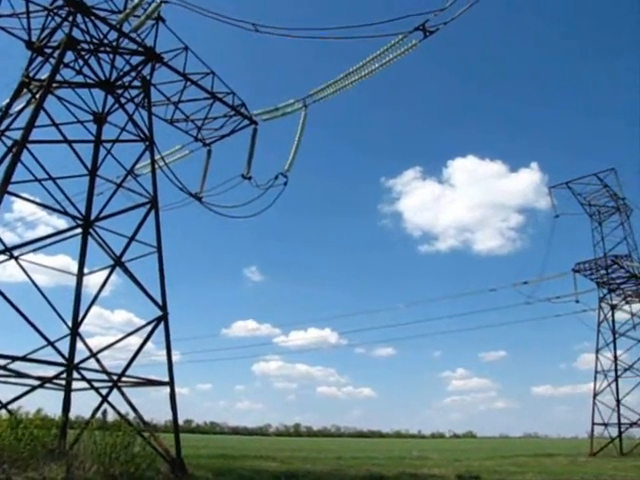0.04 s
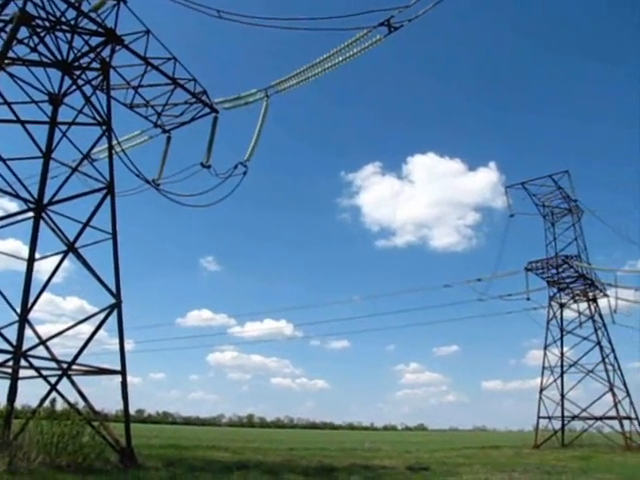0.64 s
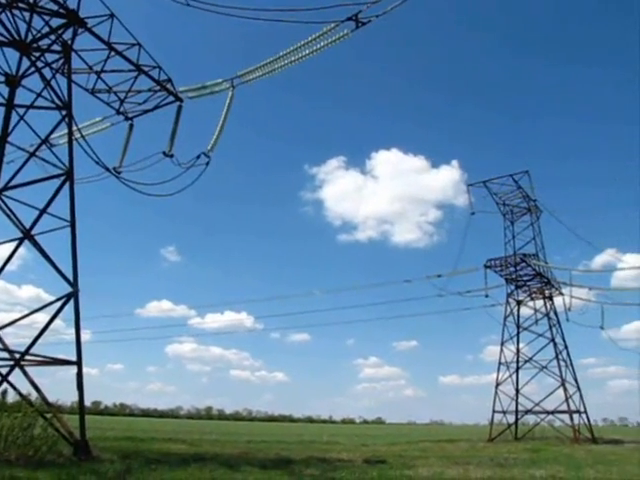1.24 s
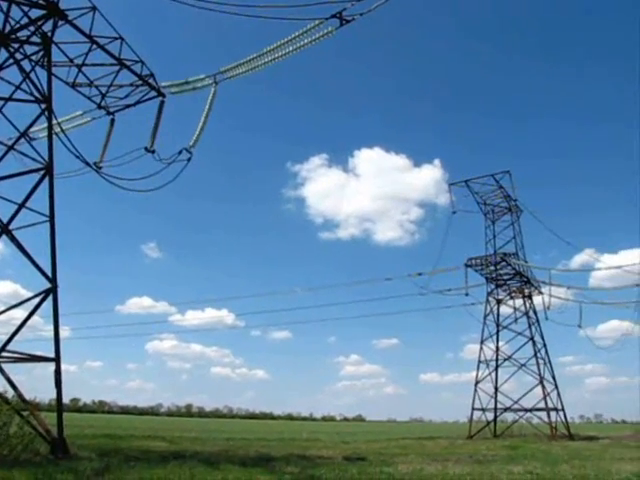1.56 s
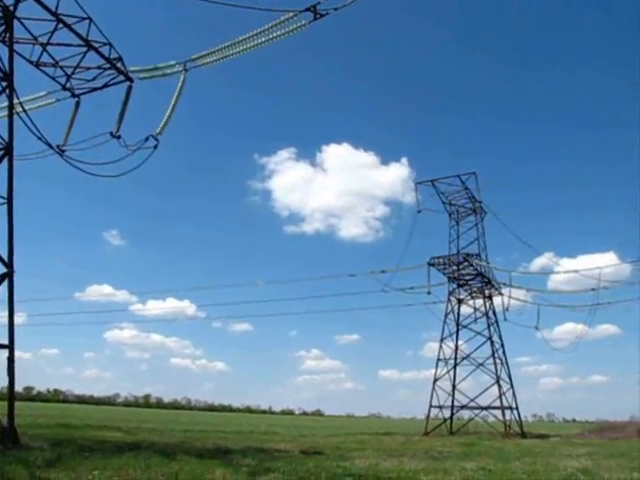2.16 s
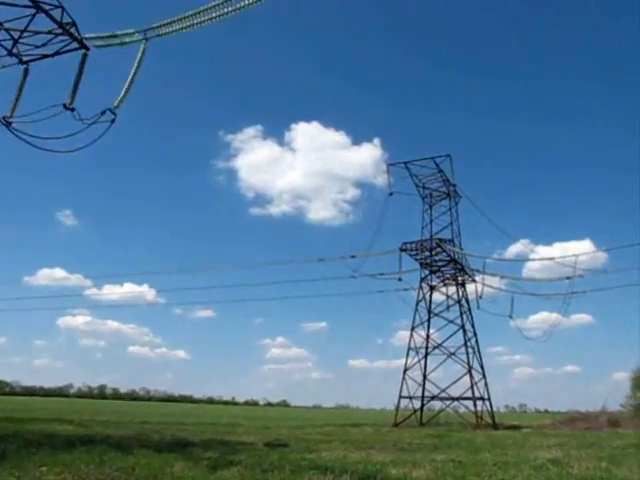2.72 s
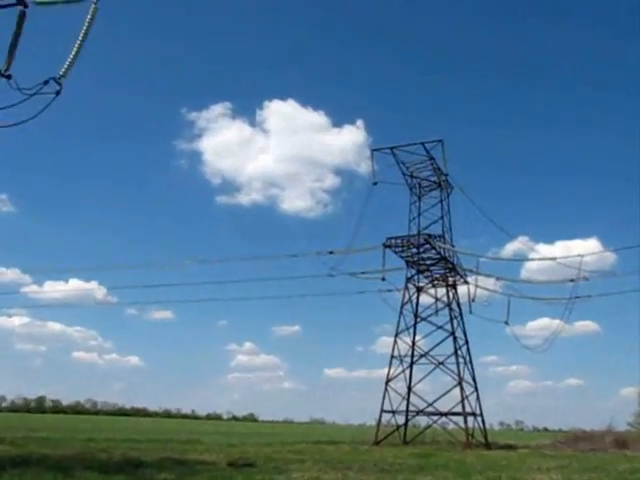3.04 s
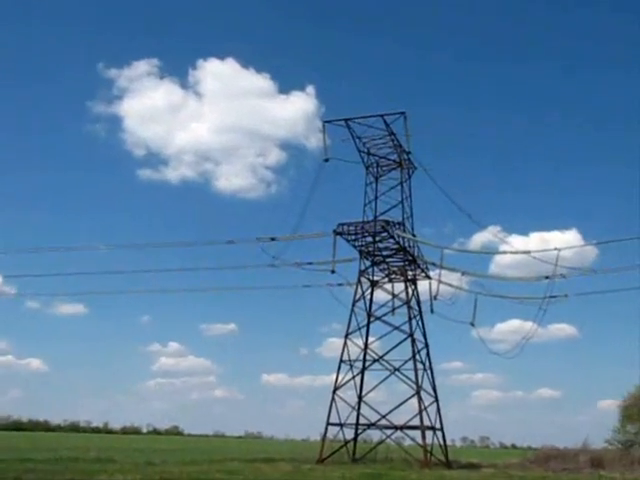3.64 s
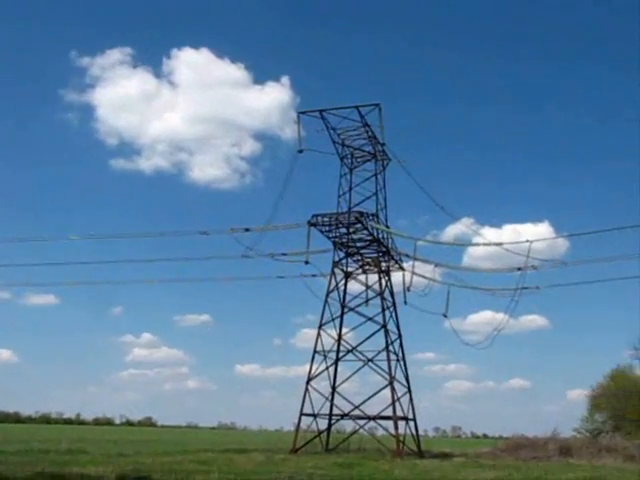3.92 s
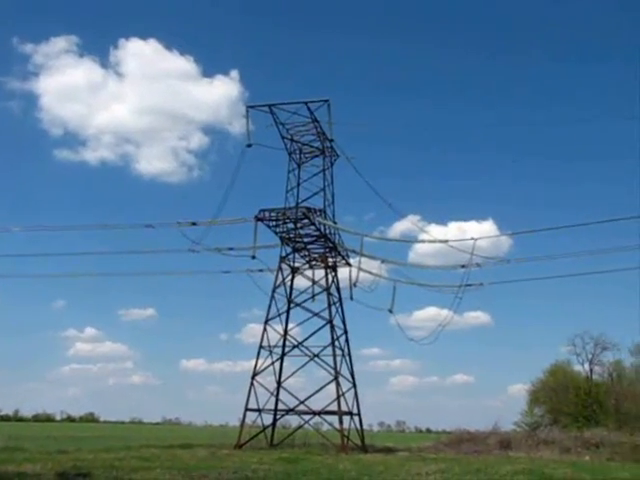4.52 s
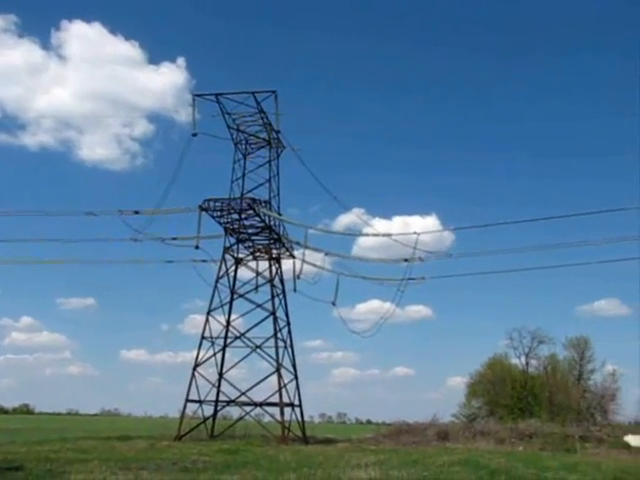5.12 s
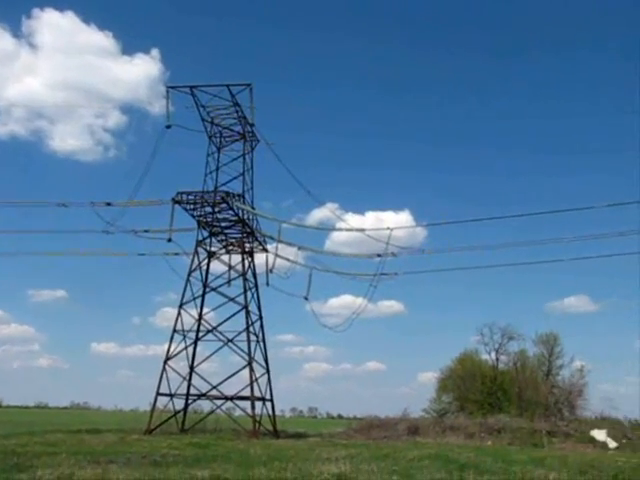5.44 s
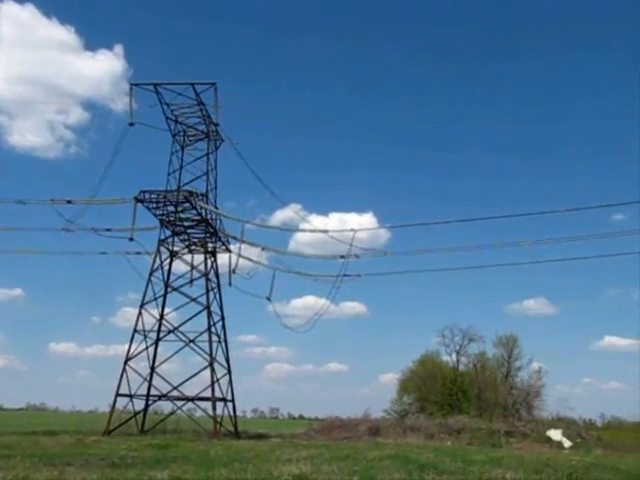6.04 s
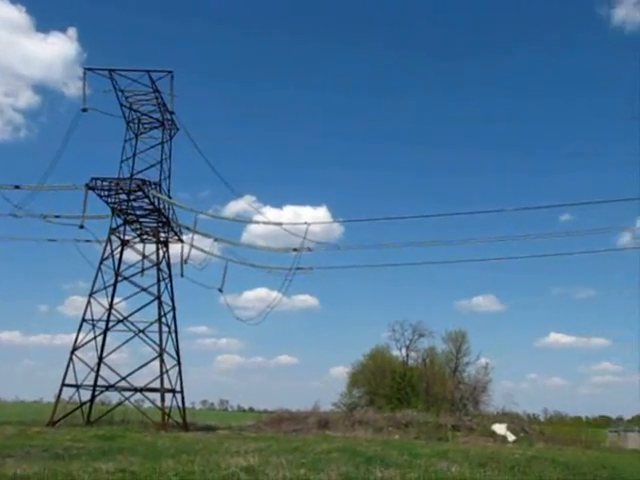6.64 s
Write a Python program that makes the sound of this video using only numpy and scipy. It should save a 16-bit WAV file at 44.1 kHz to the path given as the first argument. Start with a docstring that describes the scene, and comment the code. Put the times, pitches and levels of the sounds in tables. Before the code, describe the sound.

Overhead power lines crackle and sizzle steadily while wind buffets the microphone, with faint distant birds and small handling ticks.

```python
"""Open field near a high-voltage pylon, heard through the two microphone ports of a hand-held camera.
From the start the line crackles with corona: a sharp snap on most positive crests of the mains cycle, a
soft sizzle on every negative one. Small birds call far off as gusts build and buffet the ports. From two
seconds in, fingers tick on the camera body. After four seconds the wind eases, rising again at the end.
All along the camera turns away from the pylon, so the line grows duller and later in the left port."""
import sys
import numpy as np
from scipy import signal
from scipy.fft import rfft, irfft, next_fast_len
from scipy.io import wavfile
from scipy.ndimage import map_coordinates

SR = 44100
rng = np.random.default_rng(int(sys.argv[2]) if len(sys.argv) > 2 else 0)


def wrap_up_sound(samples):
    """Save the sound to the file named by the first command line argument, as 16-bit audio."""
    columns = np.atleast_2d(samples).T
    # keep every value between -1 and 1, then stretch to whole-number steps
    tamed = np.clip(columns, -1, 1)
    steps = np.round(tamed * 32767).astype(np.int16)
    wavfile.write(sys.argv[1], SR, steps)


N = 298557
TIME = np.arange(N) / SR
MAINS_HZ = 50

# the line as heard at the camera: time_s, snap_db, sizzle_db, left_treble_db
LINE_LEVELS = [(0, 1, -1.5, -0.5), (1, 0, -0.5, -1), (2, 0, 0, -3), (2.8, 1, -1.5, -4), (3.6, -1, -4, -3.5),
               (4.4, -.8, -2.5, -4), (5.2, -.5, -2, -7), (6, 1, -3.5, -6), (6.77, 1, 0, -4)]
# when the line sounds within each mains cycle, drifting slowly, and how late the left port hears it: time_s,
# arrival_after_cycle_start_s, left_port_lag_s
LINE_TIMING = [(0, .0009, .000008), (2, .0012, .00002), (3.7, .00155, .000034), (5, .00148, .00005),
               (6.77, .00168, .000055)]


def amp(db):
    """Decibels to gain."""
    return 10 ** (np.asarray(db) / 20)


def unit(x):
    """x scaled to rms 1."""
    return x / np.sqrt(np.mean(x ** 2) + 1e-20)


def along(points, hz):
    """(Hz, value) points read on a log frequency axis."""
    point_hz, values = np.transpose(points)
    return np.interp(np.log(hz + 1), np.log(point_hz), values)


def curves(rows, at):
    """Each column after the time, read at the given times."""
    times, *columns = np.transpose(rows)
    return [np.interp(at, times, column) for column in columns]


def wobble(rate):
    """A smooth random curve, rate knots a second."""
    return map_coordinates(rng.standard_normal(int(N * rate / SR) + 4), [TIME * rate])


def filtered(x, response):
    """x times a response of frequency."""
    size = 2 * next_fast_len(N // 2 + SR // 4)
    return irfft(rfft(x, size) * response(np.fft.rfftfreq(size, 1 / SR)), size)[..., :N]


def coloured(x, spectrum):
    """x through a minimum-phase filter with the given (Hz, dB) outline."""
    def response(hz):
        cepstrum = irfft(np.log(amp(along(spectrum, hz))))
        half = len(cepstrum) // 2
        return np.exp(rfft(np.r_[cepstrum[0], 2 * cepstrum[1:half], np.zeros(half)]))
    return filtered(x, response)


def noise(spectrum, alike):
    """Stereo noise of rms 1 with a (Hz, dB) colour and a (Hz, correlation) likeness of left and right."""
    def response(hz):
        angle = np.arccos(np.clip(along(alike, hz), -1, 1)) / 2
        return amp(along(spectrum, hz)) * [np.cos(angle), np.sin(angle)]
    mid, side = filtered(rng.standard_normal((2, N)), response)
    return unit(np.array([mid + side, mid - side]))


def clicks(times, sizes, order=8):
    """Impulses that may fall between samples."""
    at = np.ravel(times)[:, None] * SR
    taps = np.floor(at).astype(int) + np.arange(1 - order, order + 1)
    shape = np.sinc(taps - at) * np.sinc((taps - at) / order) * np.ravel(sizes)[:, None]
    return np.bincount(np.clip(taps, 0, N).ravel(), shape.ravel(), N + 1)[:N]


def panned(x, left_db):
    """x leaning to the left by left_db."""
    return x * amp(np.reshape([left_db, -left_db], (2, -1)) / 2)


def field(level_db=-45, sway_db=-1.0):
    """The even rush of breeze over open land, all around the microphone."""
    # spectrum of the rush: frequency_hz, level_db
    rush_colour = [(100, -15), (300, -0.5), (550, 2), (850, 0.5), (1200, -5), (1800, -4.5), (2800, -8),
                   (4000, -10), (6500, -11), (8500, -18.5), (12000, -21), (15500, -28)]
    # how alike the two ports hear it: frequency_hz, correlation
    rush_alike = [(200, 1), (700, 0.81), (1300, 0.53), (2500, 0.068), (6000, 0.22), (12000, 0.071)]
    rush = amp(level_db + sway_db * wobble(2.754)) * noise(rush_colour, rush_alike)
    return panned(rush, left_db=1.5)


def birds(level_db=-2, trill_hz=32, waver_hz=34, fade_db_per_s=25, wet_db=1, t60=0.35):
    """Far off, thin rising whistles and a fading trill, wavering a little and diffused by the tree line."""
    # the calls: start_s, length_s, start_hz, end_hz, level_db, trill_depth_hz
    notes = [(.39, .08, 4500, 4860, -58, 0), (.555, 0.075, 4570, 4760, -47, 0),
             (.735, 0.075, 4460, 4700, -47.5, 0), (.89, 0.13, 4460, 4720, -47.5, -4),
             (1.07, 0.323, 3230, 3110, -44.5, 180), (3.46, 0.0292, 3440, 4470, -43, 0),
             (4.198, 0.018, 3400, 3700, -56, 0), (4.424, 0.029, 3080, 3500, -50, 0),
             (4.492, 0.035, 3340, 4720, -46, 0)]
    song, waver = np.zeros(N), waver_hz * wobble(250)
    for start, length, start_hz, end_hz, db, depth_hz in notes:
        t = np.arange(int(length * SR)) / SR
        span = slice(round(start * SR), round(start * SR) + len(t))
        trill = depth_hz * np.tanh(2 * np.sin(2 * np.pi * trill_hz * t))
        hz = start_hz + (end_hz - start_hz) * t / length + trill + waver[span]
        swell = amp(db + level_db - fade_db_per_s * t) * np.sqrt(np.sin(np.pi * t / length))
        song[span] += swell * np.sin(2 * np.pi * np.cumsum(hz) / SR)
    t = np.arange(SR // 2) / SR
    tail = rng.standard_normal((2, len(t))) * amp(-60 * t / t60)
    diffuse = signal.fftconvolve(song[None], tail / np.linalg.norm(tail[0]), axes=1)[:, :N]
    return song + amp(wet_db) * diffuse


def handling(tick_t60=.03, attack_s=.0007, phase_jitter=.04):
    """Each shift of the grip rings the camera body and gives a dry tick; soft touches favour low modes."""
    # fingers on the body: start_s, knock_db, ring_length_ratio, hardness_db_per_octave, tick_db
    touches = [(2.177, -31, 1.8, -13, -46), (2.208, -37, 0.41, 10, -29.5), (2.347, -37, 0.5, 9, -41),
               (3.004, -24.5, 0.4, -4.5, -45), (3.587, -39, 0.85, -4, -31.5), (3.728, -31.5, 1.12, 6, -38)]
    # resonances of the body: pitch_hz, level_db, t60_s
    body_modes = [(586, 0.5, 0.068), (904, 6.5, 0.023), (1110, -21, 0.064), (1500, -13, 0.04),
                  (2420, -21, 0.028)]
    # spectrum of a tick: frequency_hz, level_db
    tick_colour = [(500, -19), (1200, -6), (3200, -1), (5000, -5), (10000, -23)]
    knocks, ticks = np.zeros(N), np.zeros(N)
    t = np.arange(SR // 8) / SR
    rise = 1 - np.exp(-t / attack_s)
    for start, knock_db, ring, hardness, tick_db in touches:
        span = slice(round(start * SR), round(start * SR) + len(t))
        for hz, mode_db, t60 in body_modes:
            db = knock_db + mode_db + hardness * np.log2(hz / body_modes[0][0])
            phase = 2 * np.pi * hz * t + phase_jitter * np.cumsum(rng.standard_normal(len(t)))
            knocks[span] += amp(db - 60 * t / (t60 * ring)) * rise * np.sin(phase)
        ticks[span] += amp(tick_db - 60 * t / tick_t60) * rise
    return knocks + ticks * noise(tick_colour, alike=[(2000, 0.49)])


def eddies(spectrum, rate, depth_db):
    """Lumpy turbulence of rms 1, all but unrelated at the two ports."""
    turbulence = noise(spectrum, alike=[(100, 0.027)])
    lumps = amp(depth_db * np.array([wobble(rate), wobble(rate)]))
    return unit(turbulence * lumps)


def wind(rumble_db=-28.0, buffet_db=-31.5, flutter_db=-45, usual_breeze_db=-28):
    """Gusts on the microphone: big eddies rumble, smaller buffet, the smallest flutter and grow fastest."""
    # the breeze at the camera: time_s, strength_db
    breeze = [(0, -35.5), (0.45, -31.5), (1.2, -21), (1.52, -27), (1.72, -22.0), (2.9, -21), (3.4, -18.5),
              (4.0, -24.5), (4.25, -42), (4.6, -37.5), (5.3, -31.5), (5.75, -41.5), (6.3, -35),
              (6.77, -23.5)]
    # single gusts, each swelling and dying alike: crest_s, length_s, above_breeze_db, extra_flutter_db
    gusts = [(0.162, 0.16, 10, -8.5), (0.495, 0.24, 5.5, 0), (0.745, 0.13, 7, 0), (1.334, 0.039, 10.5, 0.5),
             (1.396, 0.052, 11.5, -4.5), (1.648, 0.095, 5.5, -1), (1.99, 0.045, 8, -8),
             (2.1, 0.086, 9, -2.5), (2.34, 0.07, 7, 6), (2.432, 0.063, 8.5, -10), (2.645, 0.097, 7, -1),
             (2.989, 0.26, 6, 4.5), (3.273, 0.1, 10.5, 0.5), (3.544, 0.061, 8, 0.5),
             (3.844, 0.11, 14.5, -1), (4.764, 0.05, 7, -8), (4.942, 0.16, 9.5, -10),
             (5.437, 0.12, 12.0, -5), (6.08, 0.15, 4.5, 2), (6.655, 0.037, 6, -2)]
    # the side that the wind strikes: time_s, left_minus_right_db
    wind_side = [(.2, -8), (.55, 5.5), (1.25, 7), (1.6, 1), (2.15, 9), (2.9, 6.5), (3.3, 15), (3.95, 15),
                 (4.2, 2.5), (4.6, 3), (4.85, 9.5), (5.7, 1.5), (6.77, 12)]
    # spectra of the big, smaller and smallest eddies: frequency_hz, level_db
    rumble_colour = [(8, -7.5), (22, -5.5), (50, 1.5), (65, -3), (95, -20), (200, -52), (1000, -120)]
    buffet_colour = [(40, -6.5), (75, 3.5), (95, 2), (150, -5), (200, -14.5), (300, -31.5), (600, -84),
                     (2500, -120)]
    flutter_colour = [(100, -16), (190, 2), (250, -4.5), (320, -9), (450, -18.5), (900, -37.5), (2500, -45),
                      (8000, -120)]
    crest, length, gust_db, extra_flutter_db = np.transpose(gusts)
    swells = np.exp(-(2 * (TIME[:, None] - crest) / length) ** 2)
    strength_db = curves(breeze, TIME)[0] - usual_breeze_db + swells @ gust_db
    ports = panned(1, curves(wind_side, TIME)[0])
    ports = ports / np.sqrt(np.mean(ports ** 2, axis=0))
    rumble = amp(rumble_db + 0.42 * strength_db) * eddies(rumble_colour, rate=26, depth_db=1.0)
    buffet = amp(buffet_db + 1.08 * strength_db) * eddies(buffet_colour, rate=25, depth_db=3)
    flutter_gain = amp(flutter_db + 1.183 * strength_db + swells @ extra_flutter_db)
    flutter = flutter_gain * eddies(flutter_colour, rate=50, depth_db=3.5)
    return ports * (rumble + buffet + flutter)


def sizzle(level_db=-47.0, hiss_db=-59, spread_db=2.3):
    """Swarms of tiny discharges light up as a conductor nears a crest; far spans blur into an even hiss."""
    # glow bursts of the three phases within a mains cycle: place_cycles, width_cycles, level_db
    glow_bursts = [(.515, .06, 0), (.06, .07, -4), (.36, .018, -6.5), (.9, .025, -6)]
    # spectra of the near swarms and of the far spans: frequency_hz, level_db
    swarm_colour = [(800, -14), (2500, -1), (3900, -13), (4700, -2), (5700, 0.5), (6600, -6.5),
                    (7500, -0.5), (8000, -7), (8550, 2.5), (9100, -7), (10200, -4), (11500, -12.5),
                    (15500, -14.5)]
    hiss_colour = [(2500, -25), (5000, -10), (8000, 3), (12000, -3), (15500, -4)]
    _, sizzle_db, _ = curves(LINE_LEVELS, TIME)
    arrival, _ = curves(LINE_TIMING, TIME)
    cycle = (TIME - arrival) * MAINS_HZ
    power = np.zeros(N)
    for place, width, db in glow_bursts:
        nearest = np.round(cycle - place).astype(int)
        size = amp(db + spread_db * rng.standard_normal(nearest.max() + 2))[nearest]
        power += size ** 2 * np.exp(-.5 * ((cycle - place - nearest) / width) ** 2)
    # the discharges differ in size, and both ports hear most of them alike
    grain = amp(2 * wobble(3000)) * (rng.standard_normal(N) + .6 * rng.standard_normal((2, N)))
    swarm = unit(coloured(np.sqrt(power) * grain, swarm_colour))
    hiss = amp(hiss_db) * noise(hiss_colour, alike=[(8000, 0)])
    return amp(level_db + sizzle_db) * swarm + hiss


def snaps(level_db=-14.3, misfire_db=-15, spread_db=1.15, jitter_s=.00012,
          echo_gain=.45, echo_s=.0012, scatter_gain=.155, t60=.009, reflections=40):
    """One streamer on most positive crests; close surfaces smear each into a short rasp."""
    # how likely a streamer is to follow one on the crest before: time_s, probability
    firing_chance = [(.4, .45), (.7, .7), (2.6, .75), (4.2, .9), (5, .35), (5.6, .35), (6, .7)]
    # the hardest streamers: time_s, above_usual_db
    hard_streamers = [(.08, 3), (.24, 3), (.32, 4), (.9, 3), (.94, 3), (1.76, 4), (2.28, 4), (2.54, 4),
                      (2.92, 4), (3.14, 3.5), (3.88, 5), (4.6, 7.5), (6.06, 5), (6.36, 6)]
    # spectrum of a snap: frequency_hz, level_db
    snap_colour = [(500, -21.5), (1100, -3), (1650, -1), (2600, -19), (3400, -1), (3950, -4.5), (4600, 1.5),
                   (6100, 2), (7200, -1.5), (8600, -3), (9400, -5), (10400, -2), (12000, -9), (15500, -13)]
    start = np.arange(int(N / SR * MAINS_HZ) + 1) / MAINS_HZ
    snap_db, _, _ = curves(LINE_LEVELS, start)
    arrival, _ = curves(LINE_TIMING, start)
    # the space charge left by one streamer can choke the next, and has cleared a cycle later
    fires = [True]
    for follows in rng.random(len(start) - 1) < curves(firing_chance, start[1:])[0]:
        fires.append(follows or not fires[-1])
    streamer_db = rng.normal(0, spread_db, len(start)) + misfire_db * ~np.array(fires)
    for time_s, extra_db in hard_streamers:
        streamer_db[round(time_s * MAINS_HZ)] = extra_db
    when = start + arrival + rng.normal(0, jitter_s, len(start))
    size = amp(level_db + snap_db + streamer_db)
    bounce = echo_s * rng.uniform(0.23, 1.094, len(start))
    early = clicks(when, size) + clicks(when + bounce, echo_gain * size)
    # each port catches its own scatter of later reflections
    late = rng.random((2, len(start), reflections)) * t60 * 2 / 3
    rasp = scatter_gain * size[:, None] * rng.standard_normal(late.shape) * amp(-60 * late / t60)
    ports = np.array([early + clicks(when[:, None] + delay, sizes) for delay, sizes in zip(late, rasp)])
    return panned(coloured(ports, snap_colour), left_db=-1.5)


def power_line(flicker_db=.9, gain=0.83):
    """The corona flickers in the moving air; as the camera turns away the left port dulls and lags."""
    # what turning away takes from each frequency: frequency_hz, share_of_loss
    shadow = [(6300, 0), (8400, 0.25), (11000, 0.75), (13500, 0.16)]
    # the two ports colour the sound a little differently: frequency_hz, left_minus_right_db
    port_tilt = [(2500, 2.0), (5500, -5.5), (9000, 3), (13000, 1)]
    corona = (snaps() + sizzle()) * amp(flicker_db * wobble(18))
    _, _, left_treble_db = curves(LINE_LEVELS, TIME)
    _, lag = curves(LINE_TIMING, TIME)
    treble = filtered(corona, lambda hz: np.clip(along(shadow, hz), 0, 1))
    left, right = corona + (amp(left_treble_db) - 1) * treble
    left = map_coordinates(left, [(TIME - lag) * SR], order=5)
    return filtered(np.array([left, right]), lambda hz: panned(gain, along(port_tilt, hz)))


def scene():
    """The line, the land and the camera in the hand."""
    return power_line() + field() + wind() + handling() + birds()


def record(dry, ceiling=.97, top_hz=15600):
    """The hardest gusts round off near full scale, and the camera keeps nothing above its band limit."""
    rounded = dry / (1 + np.abs(dry / ceiling) ** 8) ** (1 / 8)
    return filtered(rounded, lambda hz: hz < top_hz)


dry = scene()
out = record(dry)
wrap_up_sound(out)
```